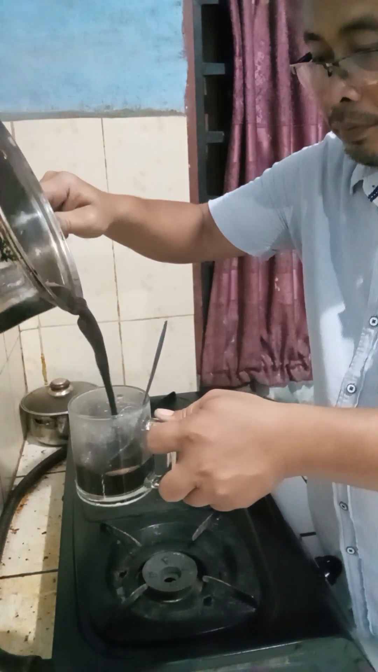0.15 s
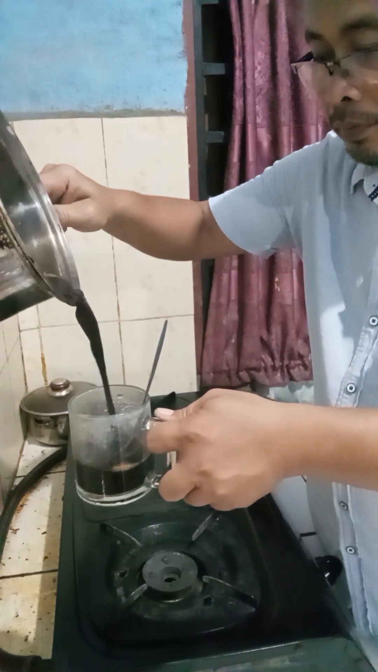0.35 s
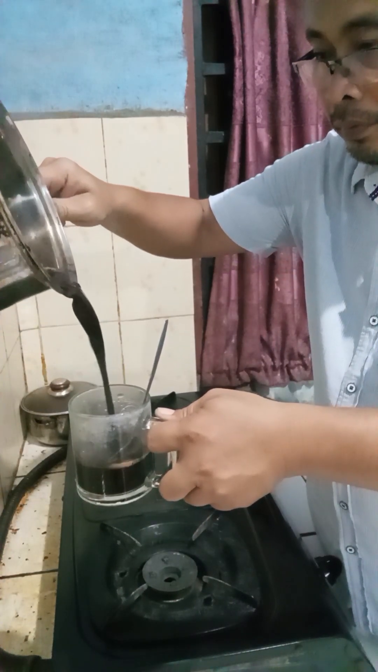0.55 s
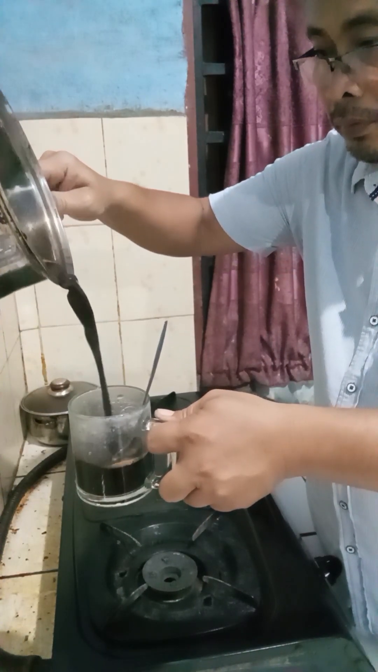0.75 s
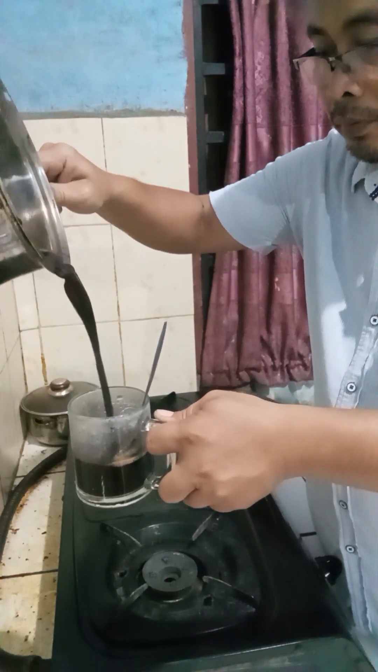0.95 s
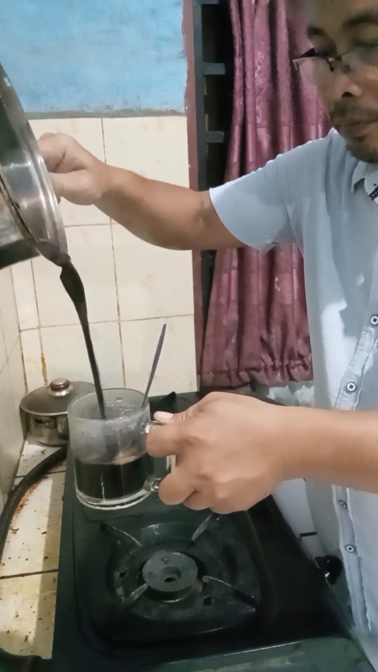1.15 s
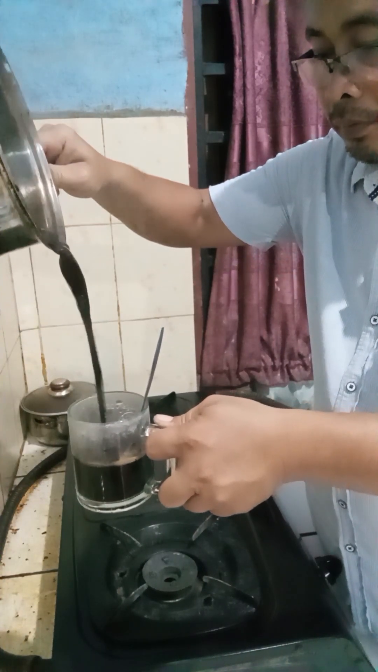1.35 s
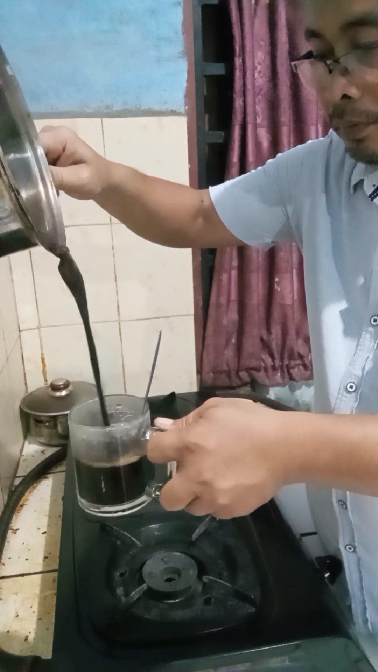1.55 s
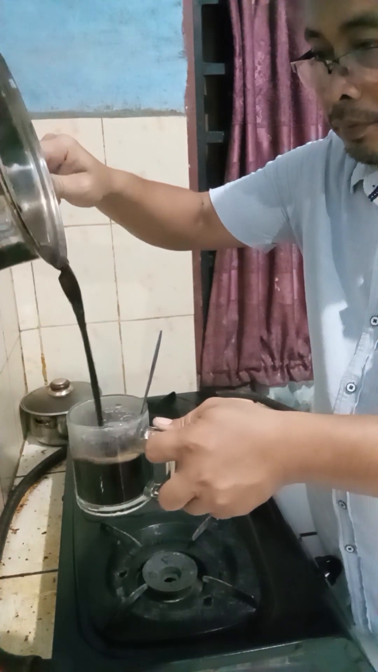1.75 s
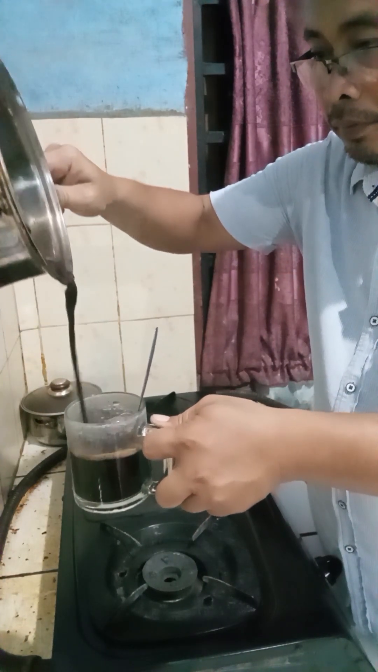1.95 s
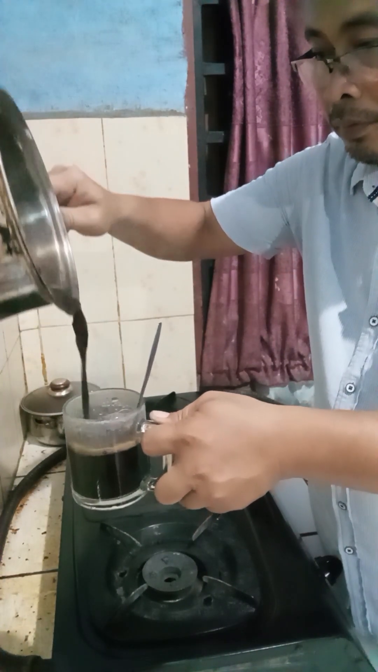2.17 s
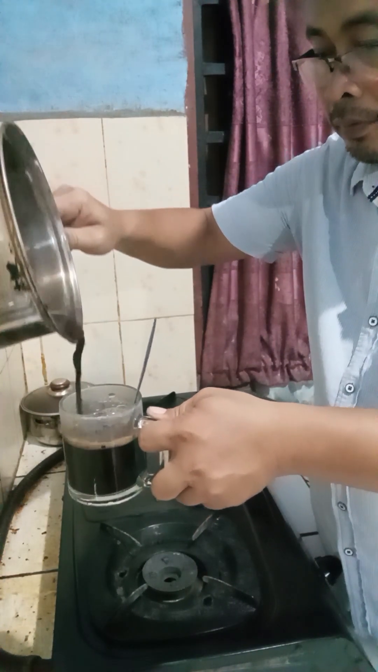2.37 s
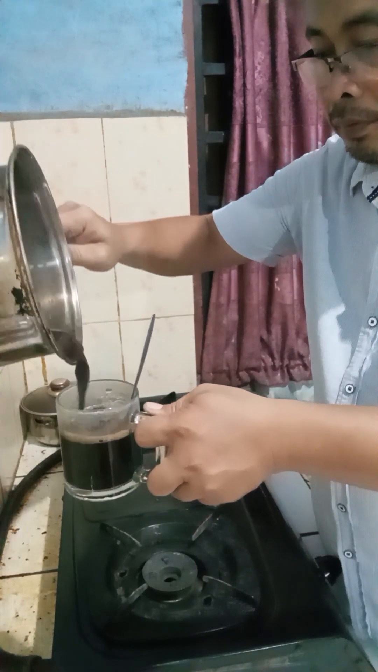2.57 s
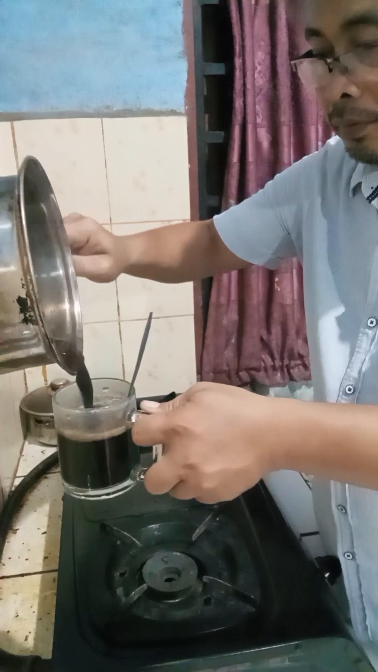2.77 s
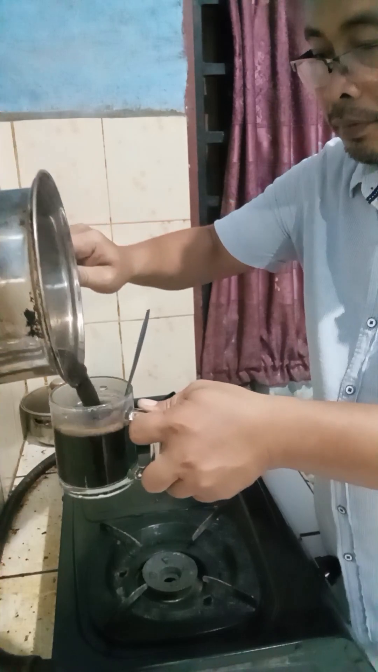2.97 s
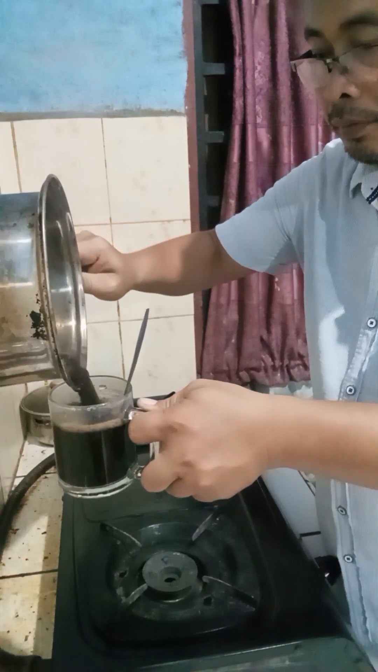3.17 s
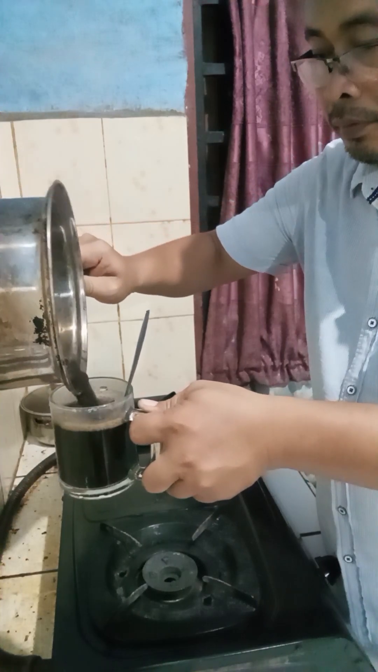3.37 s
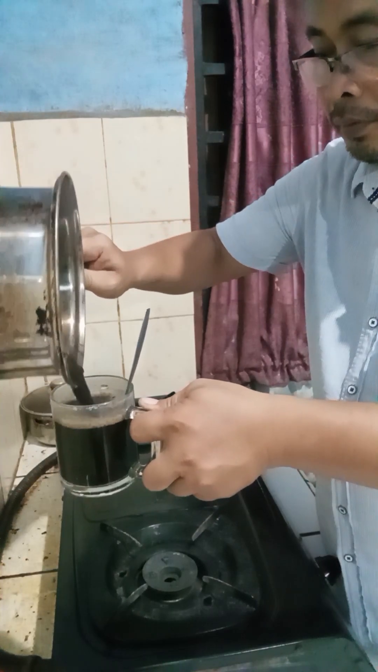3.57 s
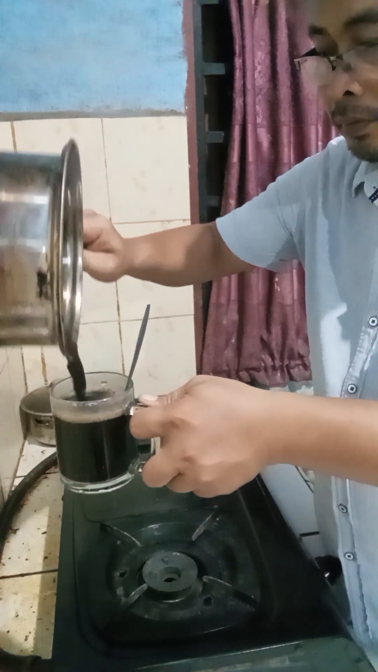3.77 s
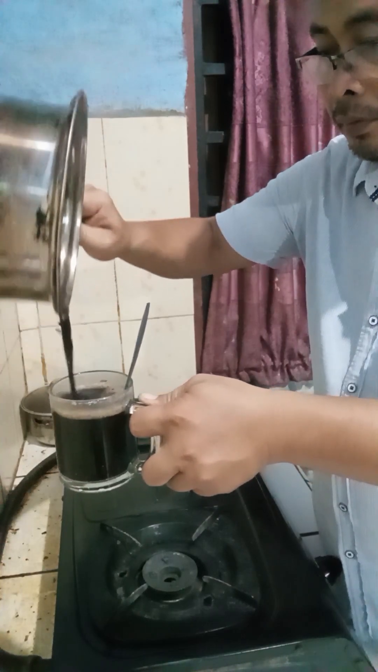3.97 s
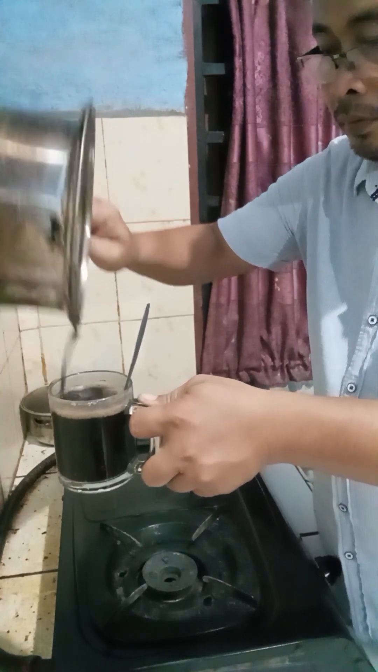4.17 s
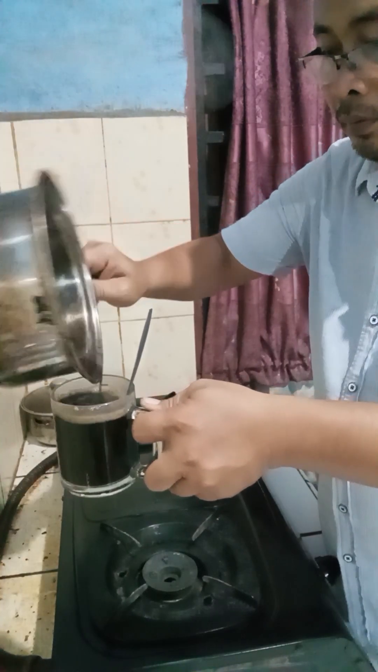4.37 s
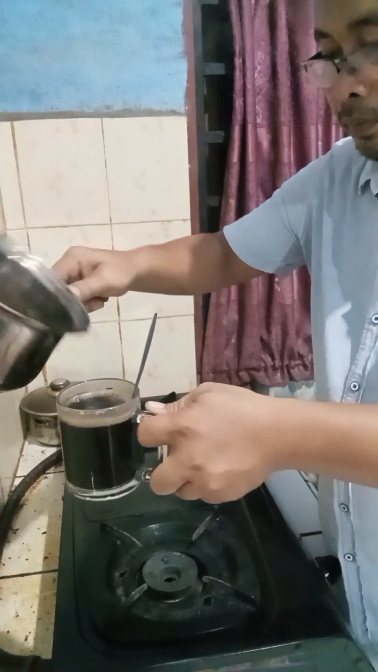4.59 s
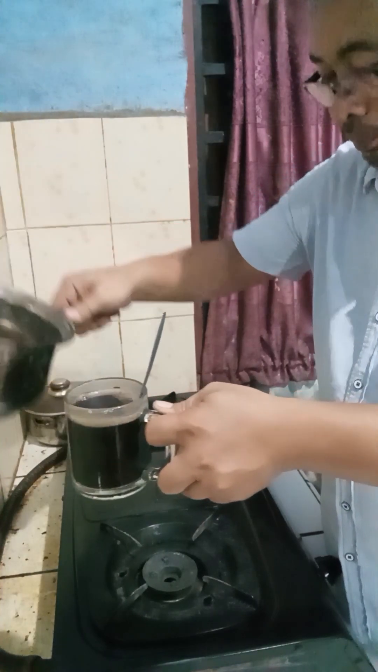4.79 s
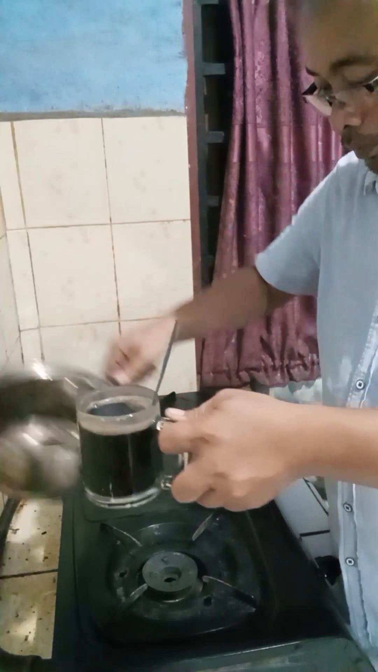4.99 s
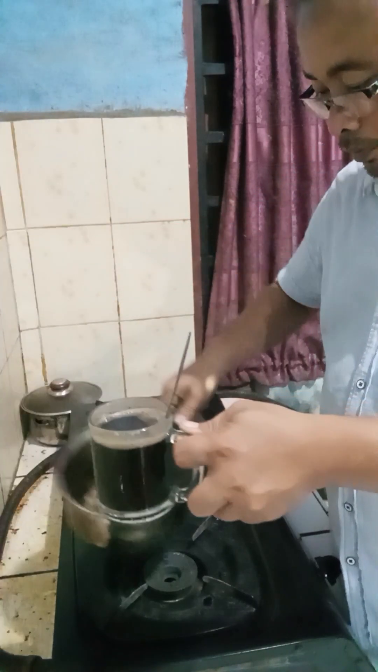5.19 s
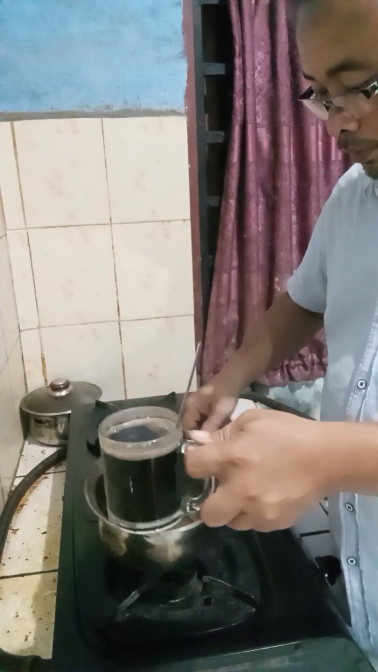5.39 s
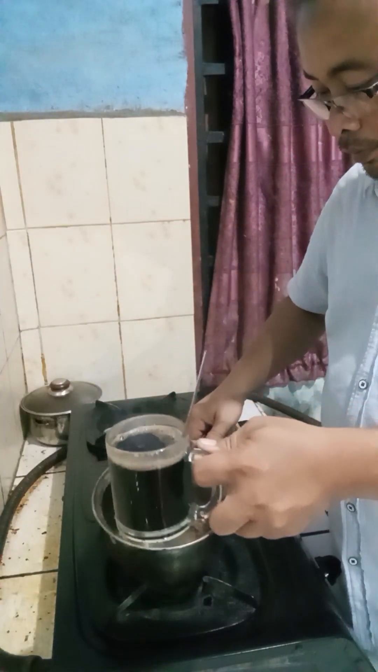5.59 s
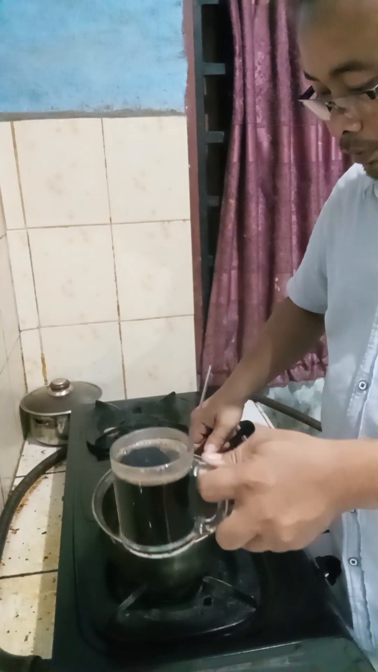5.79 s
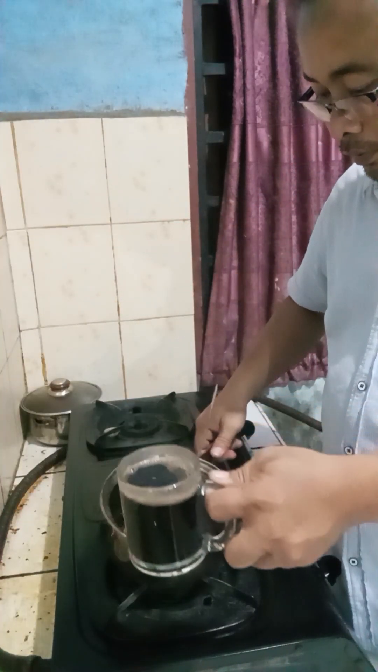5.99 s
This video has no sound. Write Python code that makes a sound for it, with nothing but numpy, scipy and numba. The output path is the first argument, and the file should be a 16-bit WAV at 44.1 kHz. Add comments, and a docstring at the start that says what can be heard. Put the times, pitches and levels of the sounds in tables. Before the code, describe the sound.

Liquid pours with bubbly gurgles and drips into a mug in a humming tiled kitchen, ending with a loud metal pan clatter.

```python
"""Coffee poured from pan to mug

Coffee runs from a steel saucepan into a glass mug in a tiled kitchen with a mains hum.
The stream trickles, gulps and spits: ringing bubbles and liquid taps drive the air above the coffee,
whose resonance mostly climbs as the mug fills. Noise bursts make splashes, spatter and wet grounds.
After the last drops the pan is set down on the stove: struck modes and noise bursts make the clatter."""
import sys
import numpy as np
from scipy import signal
from scipy.io import wavfile
from scipy.ndimage import uniform_filter1d
from numba import njit

SR = 44100
rng = np.random.default_rng(int(sys.argv[2]) if len(sys.argv) > 2 else 0)


def unload_audio(sound):
    """Save the sound as a 16-bit wav file, at the path given as the first command line argument."""
    columns = np.transpose(np.atleast_2d(sound))
    # keep every value between -1 and 1, then stretch to whole-number steps
    steps = np.round(np.clip(columns, -1, 1) * 32767)
    wavfile.write(sys.argv[1], SR, steps.astype(np.int16))


N = 266364
TIME = np.arange(N) / SR
CUTOFF_HZ = 15950
FULL_FLOW_DB = -40  # reference flow for the levels and rates that follow the stream
POUR_END_S, POUR_FADE_S = 4.415, 0.27

# force of the stream, fading as the pan sinks to the rim and empties: t/s, relative level/dB
FLOW = [(0, -52.5), (.2, -58), (.25, -58), (.42, -48), (.52, -44), (.56, -61), (.6, -42.5), (.71, -41),
        (.74, -42.5), (.8, -40.5), (1.0, -38.5), (1.13, -37), (1.27, -37), (1.55, -42), (1.7, -39),
        (1.86, -39.5), (2.1, -51), (2.35, -45), (2.55, -56.5), (3.05, -50), (3.3, -62.5), (4.3, -61.5)]
# surges, when lumps of grounds slide over the lip:
# start t/s, length/s, churning level/dB, gurgle level/dB, spray level/dB
SURGES = [(1.013, 0.062, -45, -38, -66), (1.166, 0.051, -43, -47, -73), (1.226, 0.089, -37.5, -43, -66),
          (1.391, 0.05, -40, -38.5, -53), (1.498, 0.039, -52, -49, -80), (1.64, 0.13, -44.5, -47, -61.5),
          (1.794, 0.03, -41, -46.5, -54.5), (1.945, 0.11, -54, -50, -67), (2.198, .04, -53.5, -57, -68),
          (2.33, 0.044, -54.5, -51.5, -91), (2.916, 0.15, -84, -72, -76.5), (4.106, 0.024, -59, -45.5, -64),
          (4.195, 0.06, -47, -43, -62)]
# drops and blobs in the stream: t/s, tap f/Hz, relative tap level/dB, bubble flurry level/dB (relative)
DROPS = [(0.166, 1490, -33, -41), (.38, 1360, -56, -46), (.47, 1320, -43, -49), (.612, 1360, -41, -46),
         (0.786, 1425, -26, -36.5), (.855, 1420, -33, -42), (.886, 1700, -28, -42), (0.967, 1410, -27, -56),
         (.983, 1425, -28.5, -58), (1.044, 2000, -27, -60), (1.085, 1230, -27, -54),
         (1.502, 1460, -25.5, -47), (1.627, 1880, -23, -33), (1.665, 1700, -32, -54),
         (1.7045, 1562, -13, -59), (1.7075, 2020, -17.5, -57), (1.948, 1810, -28.5, -34.5),
         (1.987, 1477, -30.5, -32.5), (2.147, 2050, -32.5, -39), (2.202, 1915, -28, -34),
         (2.223, 1450, -36, -45), (2.340, 1810, -25, -42), (2.358, 1850, -28, -59), (2.378, 1880, -36, -65),
         (2.589, 1720, -34.5, -43), (2.68, 1740, -33, -71), (2.902, 2200, -40, -57),
         (2.931, 2200, -37, -68.5), (2.947, 1930, -33, -62), (2.989, 1924, -30.5, -74),
         (3.037, 2110, -36, -72), (3.056, 2030, -31, -70.5), (3.106, 1950, -43, -62),
         (3.1235, 1930, -21.5, -65), (3.177, 2040, -41, -72), (3.237, 2100, -41, -77),
         (3.368, 2000, -41, -52), (3.409, 2120, -43, -72), (3.793, 2090, -37, -72.5),
         (3.993, 2470, -40, -67), (4.027, 1950, -29, -53), (4.209, 1670, -34.5, -58),
         (4.274, 2040, -27.5, -66), (4.304, 1970, -36, -64), (4.344, 1940, -32, -70)]
# colour of the spray: f/Hz, relative level/dB
SPRAY = [(2500, 10.5), (4000, 5), (6000, 6.5), (7500, 12.5), (9000, -34), (12000, -8), (15500, -1)]
# the pan meets the burner grate and rocks: t/s, relative steel level/dB, relative stove body level/dB
CONTACTS = [(5.748, 1, -8.5), (5.7520, -10, -8), (5.7598, -15, 1), (5.7692, -43, -7.5), (5.7775, -29, -4),
            (5.7840, -37, -7.5), (5.7926, -14, -5), (5.8080, -12, -22), (5.836, -16, -15),
            (5.872, -18, -12.5), (5.945, -31, -24)]


def from_db(db):
    """Decibels to gain."""
    return 10 ** (np.asarray(db) / 20)


def rms_one(x):
    """Scale to unit power."""
    return x / np.sqrt(np.mean(x ** 2) + 1e-20)


def in_time(rows):
    """Each column of a curve at every sample."""
    s, *columns = np.transpose(rows)
    return [np.interp(TIME, s, c) for c in columns]


def at_hz(points, hz):
    """Read a table on a log-frequency axis."""
    table_hz, values = np.array(points).T
    return np.interp(np.log(hz), np.log(table_hz), values)


def add(out, s, sound):
    """Mix a short sound in at time s."""
    i = round(s * SR)
    out[i:i + len(sound)] += sound[:N - i]


def clicks(times, db):
    """One impulse per event."""
    out = np.zeros(N)
    out[np.round(np.asarray(times) * SR).astype(int)] = from_db(db)
    return out


def high_pass(x, hz, order):
    """Thin the bass, since small sources radiate little of it."""
    return signal.sosfilt(signal.butter(order, hz, "high", fs=SR, output="sos"), x + 1e-18)


def low_pass(x, hz, order):
    """Take off the treble."""
    return signal.sosfilt(signal.butter(order, hz, "low", fs=SR, output="sos"), x + 1e-18)


def band_pass(x, low_hz, high_hz):
    """Keep one band."""
    return signal.sosfilt(signal.butter(2, [low_hz, high_hz], "band", fs=SR, output="sos"), x)


def wander(cutoff_hz):
    """Slow random motion, spread 1: noise with everything quicker than the cutoff rolled off."""
    return rms_one(low_pass(rng.standard_normal(N + SR), cutoff_hz, order=2)[SR:])


def noise_bands(size):
    """White noise in third-octave bands, as (centre Hz, band)."""
    edges = np.geomspace(22, 17500, 30)
    bands = []
    for low, high in zip(edges, edges[1:]):
        noise = rng.standard_normal(size + 4000)
        bands.append((np.sqrt(low * high), band_pass(noise, low, high)[4000:]))  # skip the filter's onset
    return bands


def coloured(spectrum):
    """Steady noise of a given colour, rms 1."""
    return rms_one(sum(from_db(at_hz(spectrum, hz)) * band for hz, band in noise_bands(N)))


def bursts(times, db, t60):
    """An envelope that jumps at each event and dies away by 60 dB in t60 seconds."""
    return signal.lfilter([1], [1, -from_db(-60 / (t60 * SR))], clicks(times, db) + 1e-18)


def evened(x, window_s):
    """Hold the slow level near 1 while the grain stays."""
    power = np.abs(uniform_filter1d(x * x, int(window_s * SR)))
    return x / np.sqrt(power + 1e-3 * np.mean(x * x))


def ring(force, hz, t60):
    """A damped resonance: a unit click sets a sine of height 1 ringing."""
    r, w = from_db(-60 / (t60 * SR)), 2 * np.pi * hz / SR
    return signal.lfilter([0, np.sin(w)], [1, -2 * r * np.cos(w), r * r], force + 1e-18)


@njit
def swept(x, w, r):
    """A resonance whose angular frequency w and damping r move; a unit click rings at about height 1."""
    y = np.zeros(len(x))
    for i in range(2, len(x)):
        y[i] = (x[i] - x[i - 2]) / 2 + 2 * r[i] * np.cos(w[i]) * y[i - 1] - r[i] * r[i] * y[i - 2]
    return y


def bubbles(per_s, low_hz, high_hz, cycles, spread_db, colour=None, count=24):
    """Bubbles of random size and pitch, each ringing down 60 dB over some cycles; rms 1."""
    sizes = from_db(spread_db * np.minimum(rng.exponential(1, N), 3)) * rng.choice([-1, 1], N)
    born = sizes * (rng.random(N) < per_s / SR)
    dealt = rng.integers(0, count, N)  # which pitch each bubble gets
    out = np.zeros(N)
    for k, hz in enumerate(np.geomspace(low_hz, min(high_hz, SR * .45), count)):
        gain = from_db(at_hz(colour, hz)) if colour else 1
        out += ring(born * (dealt == k), hz, cycles / hz) * gain
    return rms_one(out)


def ping(hz, cycles, rise):
    """A tiny bubble swells for some cycles, rings and fades, creeping up in pitch; envelope peak 1."""
    t = TIME[:SR // 40]
    age = t * hz / cycles
    return age * np.exp(1 - age) * np.sin(2 * np.pi * hz * t * (1 + rise * age))


def surge_gain(start, length):
    """A surge swells, holds and dies away; height 1."""
    attack_s, release_s = 0.021, 0.026
    swell = np.clip((TIME - start) / attack_s, 0, 1)
    return swell * np.exp(-np.maximum(TIME - start - length, 0) / release_s)


def surging(levels_db):
    """The envelopes of all surges together, each at its own level."""
    return sum(from_db(db) * surge_gain(row[0], row[1]) for row, db in zip(SURGES, levels_db))


def mug_air(x):
    """The quarter-wave resonance of the air left in the mug and an overtone, driven by liquid impacts."""
    # air column above the coffee, broadly more damped as it shortens: t/s, resonance f/Hz, width/Hz
    air_column = [(0, 1380, 172), (.5, 1353, 65), (.97, 1387, 79), (1.1, 1360, 170), (1.4, 1420, 278),
                  (1.7, 1670, 380), (2.3, 1790, 300), (3.1, 1950, 410), (3.8, 2200, 500), (4.3, 1980, 700)]
    overtone_ratio, overtone_extra_width_hz, overtone_db = 2.6, 900, -29
    slosh_hz, slosh_share = 23, 0.21  # the sloshing surface shifts the pitch by a share of its width
    hz, width_hz = in_time(air_column)
    w = 2 * np.pi * (hz + slosh_share * width_hz * wander(slosh_hz)) / SR
    drive = high_pass(x, hz=900, order=3)
    soft = low_pass(drive, hz=2400, order=7)
    firm = low_pass(drive, hz=6000, order=3)
    fundamental = swept(soft + 1e-18, w, np.exp(-np.pi * width_hz / SR))
    overtone_damping = np.exp(-np.pi * (width_hz + overtone_extra_width_hz) / SR)
    overtone = swept(firm + 1e-18, overtone_ratio * w, overtone_damping)
    return fundamental + from_db(overtone_db) * overtone


def stream():
    """The pour: small bubbles voiced by the mug, bigger ones gurgling and churning in surges, fine spray."""
    gurgle_wander_hz, gurgle_depth_db, flurry_t60_s = 15.3, 3, 0.12
    # level at full flow, and the share of the flow's swing that each follows
    churn_db, churn_follows = -63.5, 0.24
    spray_db, spray_follows = -71, 0.029
    flow_db, = in_time(FLOW)
    swing_db = flow_db - FULL_FLOW_DB
    drop_s, _, _, flurry_db = np.transpose(DROPS)
    _, _, surge_churn_db, surge_gurgle_db, surge_spray_db = np.transpose(SURGES)

    trickle_gain = from_db(flow_db + gurgle_depth_db * wander(gurgle_wander_hz))
    trickle_gain = trickle_gain + bursts(drop_s, flurry_db, t60=flurry_t60_s)
    churn_gain = from_db(churn_db + churn_follows * swing_db) + surging(surge_churn_db)
    gurgle_gain = surging(surge_gurgle_db)
    spray_gain = from_db(spray_db + spray_follows * swing_db) + surging(surge_spray_db)

    patter = bubbles(per_s=550, low_hz=1106, high_hz=2200, cycles=6.9, spread_db=7.5)
    singing = bubbles(per_s=320, low_hz=1115, high_hz=2110, cycles=34, spread_db=5.5)
    voiced = rms_one(mug_air(patter + from_db(-0.5) * singing))
    trickle = voiced + from_db(-12.5) * high_pass(singing, hz=1130, order=3)
    churn = bubbles(per_s=300, low_hz=335.5, high_hz=837, cycles=32.0, spread_db=6.5)
    churn = high_pass(churn, hz=270, order=4)
    gurgle = bubbles(per_s=1100, low_hz=926, high_hz=2000, cycles=14.7, spread_db=5.5)
    gurgle = high_pass(gurgle, hz=700, order=2)
    spray = bubbles(per_s=550, low_hz=2800, high_hz=12500, cycles=36, spread_db=5, colour=SPRAY, count=60)
    spray = high_pass(spray, hz=2350, order=4)

    pouring = np.clip((POUR_END_S - TIME) / POUR_FADE_S, 0, 1)
    return pouring * (from_db(-6.0) * trickle_gain * evened(trickle, window_s=0.032)
                      + churn_gain * evened(churn, window_s=0.071)
                      + gurgle_gain * evened(gurgle, window_s=0.027)
                      + spray_gain * evened(spray, window_s=0.084))


def plops(rise, bubble_gain_db, splash_gain_db):
    """A plunging gulp slaps the surface, traps a bubble that rises in pitch, kicks the air and splashes."""
    # gulps plunging in: t/s, bubble f/Hz, cycles to ring down 60 dB,
    # bubble level/dB, impact level/dB, splash level/dB (all relative)
    gulp_rows = [(1.012, 436, 16, -34.5, -26.5, -74), (1.042, 488, 12, -40, -22.5, -56),
                 (1.180, 437, 13, -39, -26.5, -48.5), (1.2276, 430, 8, -18, -20.5, -68),
                 (1.243, 710, 18, -24, -44, -61), (1.261, 784, 16, -21, -18.5, -48),
                 (1.274, 730, 13, -33, -34, -64), (1.290, 810, 22, -27, -28, -50),
                 (1.308, 438, 13, -37, -41, -60), (1.3588, 396, 16, -34, -25.5, -49),
                 (1.379, 450, 3.8, -14, -28, -64), (1.400, 724, 19, -25, -21.5, -39.5),
                 (1.452, 730, 24, -34.5, -37, -50), (1.505, 595, 33, -34, -37, -57),
                 (1.535, 721, 36, -37.5, -48, -70), (1.7062, 593, 27, -28, -21, -48),
                 (1.724, 660, 13, -23.5, -45, -46), (1.809, 591, 11.7, -27, -25, -43),
                 (1.880, 617, 61, -36.5, -54, -62), (2.201, 398, 12, -43, -45, -61),
                 (2.451, 450, 17, -46, -32.5, -54.5), (2.6529, 357, 14, -35.5, -31, -61),
                 (3.1224, 470, 8.4, -12, -19, -51), (3.135, 1280, 18, -27, -39, -62),
                 (3.141, 620, 81, -35.5, -34, -58), (3.147, 1060, 25, -29.5, -53, -62),
                 (3.172, 609, 90, -43, -49, -54.5), (4.107, 540, 16, -21, -30.5, -51),
                 (4.141, 516, 16.5, -33, -37, -49.5), (4.188, 505, 14, -35.5, -40, -50.5),
                 (4.2205, 500, 10, -27, -25, -50), (4.234, 1340, 22, -48, -39, -60),
                 (4.248, 466, 24, -33.5, -34, -47.5), (4.274, 452, 28, -33.5, -27, -43),
                 (4.3425, 451, 14, -35.5, -44.5, -44.5), (4.362, 458, 15, -44, -46, -74)]
    # colour of a splash: f/Hz, relative level/dB
    splash_colour = [(300, -27), (700, -4), (1300, -11), (2000, 16), (2900, 1), (4500, 3), (6300, 5),
                     (7400, -19), (9000, 3.5), (12000, -29), (15500, -15)]
    slap_high_db, slap_low_db, kick_db = -3, 4, 1.5  # relative to the impact
    s, pitch, ring_cycles, bubble_db, impact_db, splash_db = np.transpose(gulp_rows)
    gulps, t = np.zeros(N), TIME[:SR // 10]
    for at, hz, cycles, db in zip(s, pitch, ring_cycles, bubble_db):
        age = t * hz / cycles
        decay = from_db(db + bubble_gain_db - 60 * age)
        add(gulps, at, decay * np.sin(2 * np.pi * hz * t * (1 + rise * age)))
    impacts = clicks(s, impact_db)
    slap = from_db(slap_high_db) * ring(impacts, hz=1360, t60=0.011)
    slap = slap - from_db(slap_low_db) * ring(impacts, hz=660, t60=0.0032)
    air = from_db(kick_db) * mug_air(impacts)
    droplets = rms_one(uniform_filter1d(rng.standard_normal(N), SR // 700))  # a splash lands in many bits
    splash = droplets * coloured(splash_colour) * bursts(s, splash_db + splash_gain_db, t60=0.062)
    return high_pass(gulps + slap, hz=362, order=6) + air + splash


def drops():
    """Single drops tap the coffee with a very short ring and drive its air column."""
    tap_cycles, tap_db, tap_air_db = 2.12, -4, -11
    times, _, levels_db, _ = np.transpose(DROPS)
    out = mug_air(clicks(times, levels_db + tap_air_db))
    for s, hz, db, _ in DROPS:
        add(out, s, from_db(db + tap_db) * ping(hz, tap_cycles, rise=0.0012))
    return out


def surface_pings():
    """The clearest tiny bubbles sing at the surface."""
    # t/s, f/Hz, relative level/dB
    ping_rows = [(.055, 5200, -51), (.095, 5170, -48), (.158, 6200, -47), (.165, 5350, -44),
                 (.204, 5310, -42), (.495, 2350, -48), (.687, 3840, -45.5), (0.849, 5820, -41),
                 (1.165, 5500, -45), (1.244, 5120, -40), (1.447, 6430, -44), (1.535, 7700, -47),
                 (1.66, 6100, -43), (1.695, 3450, -53), (1.904, 7500, -43), (2.223, 5180, -38.5),
                 (2.24, 5260, -46), (2.311, 5055, -41.5), (2.328, 4930, -44), (2.563, 5090, -45),
                 (2.581, 5200, -48), (2.62, 5120, -44), (2.635, 4950, -46), (2.948, 4142, -49),
                 (3.816, 2385, -44)]
    out = np.zeros(N)
    for s, hz, db in ping_rows:
        add(out, s, from_db(db - 10) * ping(hz, cycles=22, rise=0.0026))
    return out


def tick(hz):
    """A droplet's tick: a brief cluster of high partials around a centre, the outer ones weaker."""
    spread = 0.084  # step between partials, as a log-frequency ratio
    out = 0
    for k in np.linspace(-2, 2, 5) + rng.uniform(-.4, .4, size=5):
        partial = ping(min(hz * np.exp(spread * k), CUTOFF_HZ), cycles=7.5, rise=0.0011)
        out = out + rng.choice([-1, 1]) * np.exp(-.8 * abs(k)) * partial
    return out


def glass_ticks():
    """Droplets and bursting bubbles tick against the glass."""
    # t/s, centre f/Hz, relative level/dB
    tick_rows = [(.687, 10200, -48), (0.784, 7050, -29), (.786, 9200, -44), (.85, 7300, -33.5),
                 (.887, 9100, -37), (0.951, 7350, -50), (1.013, 8500, -40), (1.041, 3800, -26),
                 (1.066, 3840, -34), (1.184, 7940, -30), (1.2, 7300, -30), (1.346, 9750, -32),
                 (1.408, 5600, -25), (1.648, 7450, -30.5), (1.737, 7560, -23), (1.9, 8900, -35.5),
                 (2.004, 9800, -42), (2.045, 8830, -30.5), (2.048, 10400, -38), (2.148, 5340, -32.5),
                 (2.16, 6360, -31), (2.453, 9700, -31.5), (2.608, 5700, -38), (2.6334, 6700, -31),
                 (2.6813, 8640, -28), (2.819, 9700, -42), (3.1226, 6180, -18.5), (3.217, 9000, -47.5),
                 (3.237, 8900, -55), (3.43, 8700, -40.5), (4.058, 9610, -27), (4.245, 6230, -21.5)]
    out = np.zeros(N)
    for s, hz, db in tick_rows:
        add(out, s, from_db(db - 13.5) * tick(hz))
    return out


def fizz():
    """Faint bubble pings at random, more often the harder the flow; surges whip up more and louder ones."""
    rate_at_full_flow, surge_rate = 70, 390  # pings per second
    typical_db, spread_db, surge_gain_db = -64.5, 2.5, 3
    flow_db, = in_time(FLOW)
    churn_db = np.transpose(SURGES)[2]
    surge = np.minimum(surging(churn_db - FULL_FLOW_DB), 1)
    per_s = rate_at_full_flow * from_db(flow_db - FULL_FLOW_DB) + surge_rate * surge
    born = np.flatnonzero((rng.random(N) < per_s / SR) & (TIME < POUR_END_S))
    out = np.zeros(N)
    for i, (pitch, size) in zip(born, rng.random(size=(900, 2))):
        hz = 3300 * 3.2 ** pitch
        db = typical_db + surge_gain_db * surge[i] - spread_db * np.log(size + 0.081)
        add(out, TIME[i], from_db(db) * ping(hz, cycles=10, rise=0.0009))
    return out


def spatter():
    """Spatter: decaying bursts of spray-coloured noise."""
    # t/s, relative level/dB
    spatter_rows = [(0.157, -45.5), (0.277, -46.5), (.41, -47), (0.636, -46), (1.405, -47), (1.738, -29.5),
                    (2.609, -39.5), (2.68, -34.5), (3.641, -51), (3.855, -49), (3.917, -46), (4.207, -40),
                    (4.371, -44)]
    return from_db(-5.0) * coloured(SPRAY) * bursts(*np.transpose(spatter_rows), t60=0.042)


def grounds():
    """Wet grounds crackle as they slide over the lip: decaying bursts of coloured noise."""
    # t/s, level/dB
    crackle_rows = [(0.02, -57.5), (0.161, -51), (.64, -56), (2.93, -49), (2.946, -44.5), (2.965, -60),
                    (3.039, -49), (3.055, -47.5), (3.106, -54), (3.80, -61), (4.355, -57), (4.37, -45.5)]
    # colour of the crackle: f/Hz, relative level/dB
    crackle_colour = [(1500, -40), (2200, 13), (2700, -2), (4100, -3.5), (5200, -29), (8000, -31)]
    return coloured(crackle_colour) * bursts(*np.transpose(crackle_rows), t60=0.05)


def struck(modes, times, db, edge_hz, scatter_db, scatter_s):
    """Each contact lands on another spot: modes vary in strength and lag; soft blows miss the high ones."""
    out = np.zeros(N)
    for hz, level_db, t60 in modes:
        lag = scatter_s * rng.random(len(times))
        softness_db = 10 * np.log10(1 + (hz / edge_hz) ** 6)
        strength_db = db + level_db - softness_db + rng.normal(0, 1, len(times)) * scatter_db
        out += ring(clicks(times + lag, strength_db), hz, t60)
    return out


def clatter():
    """The pan's base hits the grate, rocks and settles: steel ring and crack, thud and grate clank."""
    # saucepan, damped by the hand, in families of close modes:
    # f/Hz, full spread/Hz, relative level/dB, t60/s
    pan_families = [(1885, 250, -34, 0.089), (2270, 100, -42, 0.09), (2434, 276, -31, 0.087),
                    (3280, 700, -40, 0.028), (4000, 760, -42, 0.033), (4930, 800, -38, 0.053),
                    (6420, 1300, -42, 0.033), (7300, 1250, -27.5, 0.034)]
    # crack of steel on steel: f/Hz, relative level/dB
    crack_colour = [(300, 16), (900, 18.5), (1500, -35), (2400, -3), (3200, 3), (5000, 3), (6000, 1),
                    (7400, -3), (8800, -3), (12000, -35), (15500, -37)]
    # the stove's many small, crowded modes merged into a thud: f/Hz, relative level/dB
    thud_colour = [(150, -26), (220, -6), (330, 8.5), (560, 2), (800, -6.5), (1050, -17), (1500, -39),
                   (3000, -69)]
    # clank of the grate's bars: f/Hz, relative level/dB
    grate_colour = [(500, -26), (680, -7), (840, 20), (1000, -3), (1250, -27), (2000, -59)]
    s, steel_db, body_db = np.transpose(CONTACTS)
    pan_modes = [(hz + spread * offset, db, t60) for hz, spread, db, t60 in pan_families
                 for offset in rng.triangular(-.5, 0, .5, size=24)]
    pan = struck(pan_modes, s, steel_db, edge_hz=10000, scatter_db=4.0, scatter_s=.0008)
    pan = high_pass(from_db(-10.0) * pan, hz=500, order=2)
    crack = high_pass(coloured(crack_colour) * bursts(s, steel_db - 22.0, t60=0.04), hz=265, order=4)
    thud = high_pass(coloured(thud_colour) * bursts(s, body_db - 25, t60=0.14), hz=193, order=4)
    grate = high_pass(coloured(grate_colour) * bursts(s, body_db - 21, t60=0.029), hz=450, order=4)
    return pan + thud + grate + crack


def stove():
    """The stove's sheet metal booms under each contact of the pan, each duller than the last."""
    # sheet-metal modes: f/Hz
    mode_hz = [88, 226, 243, 316, 370, 408, 448, 486, 523, 556, 602, 631, 766, 797, 864, 896, 985, 1075,
               1303]
    # the same modes: relative level/dB, t60/s
    mode_ring = [(-40, .7), (-25, 0.36), (-30, 0.32), (-24.5, 0.33), (-23.5, 0.25), (-19.5, 0.45),
                 (-21, 0.22), (-18, 0.26), (-35, 0.18), (-22, 0.21), (-18, 0.21), (-22.5, 0.18),
                 (-20.5, 0.2), (-20, 0.27), (-15.5, 0.22), (-24, 0.12), (-23, 0.2), (-25.5, 0.13),
                 (-42, 0.3)]
    # the treble rolls off above an edge that falls from the first blow towards the last
    first_blow_hz, last_blow_hz, settle_s = 1700, 620, 0.02
    s, _, body_db = np.transpose(CONTACTS)
    edge_hz = last_blow_hz + (first_blow_hz - last_blow_hz) * np.exp(-(s - s[0]) / settle_s)
    modes = [(hz, db, t60) for hz, (db, t60) in zip(mode_hz, mode_ring)]
    boom = struck(modes, s, body_db, edge_hz, scatter_db=3.0, scatter_s=0.0014)
    return high_pass(from_db(-6.0) * boom, hz=200, order=3)


def kitchen(first_s, build_s):
    """Echo of the tiled walls: a short gap, then a dense tail whose bass lasts longest; energy 1."""
    # reverberation: f/Hz, t60/s
    room_t60 = [(100, 0.62), (500, 0.25), (2000, 0.23), (7000, 0.2), (15000, 0.29)]
    t = TIME[:SR // 2]
    tail = sum(band * from_db(-60 * t / at_hz(room_t60, hz)) for hz, band in noise_bands(len(t)))
    near_walls = 1 + 2 * np.exp(-t / 0.018)  # stronger early part
    tail = tail * np.clip((t - first_s) / build_s, 0, 1) * near_walls
    return tail / np.sqrt(np.sum(tail ** 2))


def background():
    """A wavering mains hum, a sine with a little narrow-band noise, over faint room noise."""
    # room noise: f/Hz, relative level per Hz/dB
    room_colour = [(25, -25), (43, -23.5), (58, -27), (100, -8), (130, -21.5), (160, -17), (220, -18.5),
                   (300, -21.5), (1000, -31.5), (4000, -41.5), (7100, -42.5), (8400, -54.5), (13000, -58.5),
                   (15000, -58), (17000, -29)]
    hum_hz, hum_db, waver_db, room_db = 100.2, -38, 0.6, -54
    hum_gain = from_db(hum_db + waver_db * wander(cutoff_hz=1.6))
    tone = np.sqrt(2) * np.sin(2 * np.pi * hum_hz * TIME)  # rms 1
    rough = rms_one(band_pass(rng.standard_normal(N), 86, 116))
    hum = hum_gain * (tone + from_db(-21.5) * rough)
    return hum + from_db(room_db) * coloured(room_colour)


def scene():
    """Pour and clatter with their echo in the kitchen, over the background."""
    pour_echo_db, stove_echo_db = -3, -8
    pour = stream() + plops(rise=0.021, bubble_gain_db=3.5, splash_gain_db=4.0) + drops()
    pour = pour + surface_pings() + glass_ticks() + fizz() + spatter() + grounds()
    pan, boom = clatter(), stove()
    sent = from_db(pour_echo_db) * pour + pan + from_db(stove_echo_db) * boom
    echo = signal.fftconvolve(sent, kitchen(first_s=0.0038, build_s=0.0072))[:N]
    return (pour + pan + boom + echo + background())[None]


def record(dry):
    """The top is cut steeply above the cutoff."""
    return signal.sosfilt(signal.ellip(10, .2, 80, CUTOFF_HZ, fs=SR, output="sos"), dry)


dry = scene()
out = record(dry)
unload_audio(out)
```